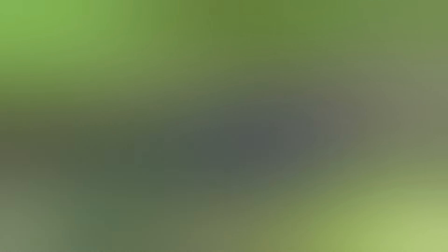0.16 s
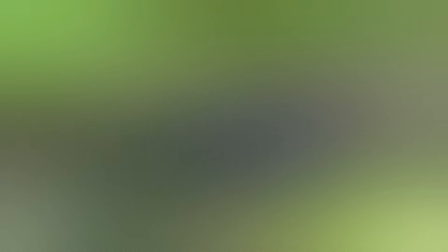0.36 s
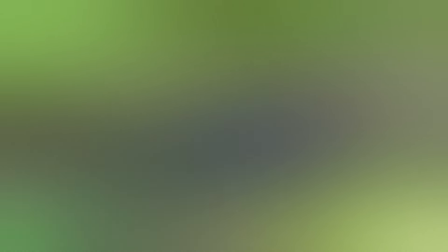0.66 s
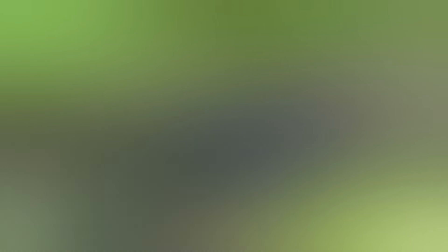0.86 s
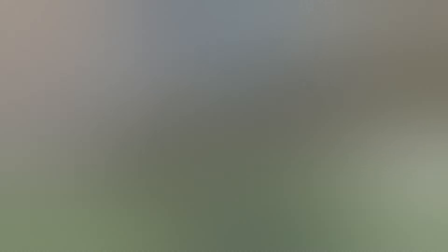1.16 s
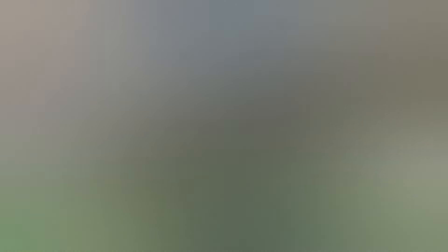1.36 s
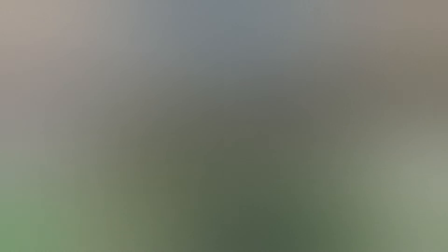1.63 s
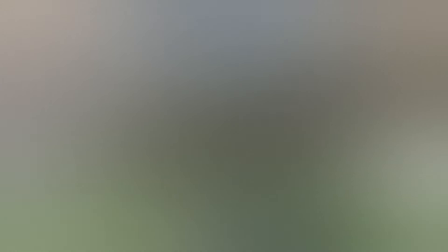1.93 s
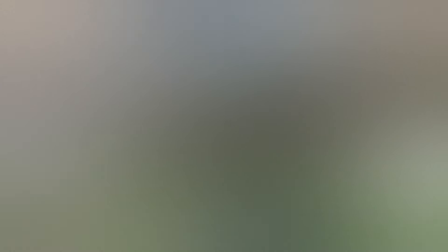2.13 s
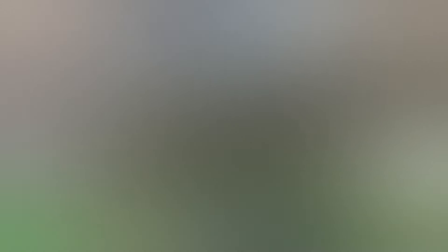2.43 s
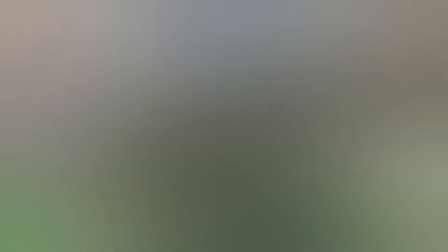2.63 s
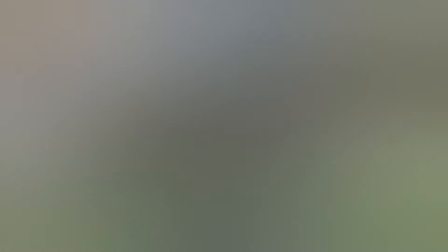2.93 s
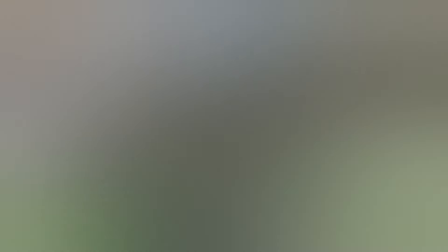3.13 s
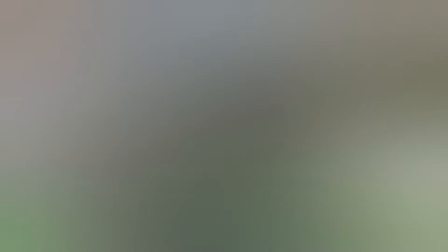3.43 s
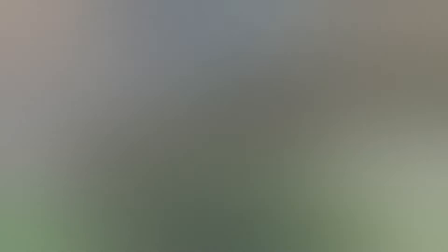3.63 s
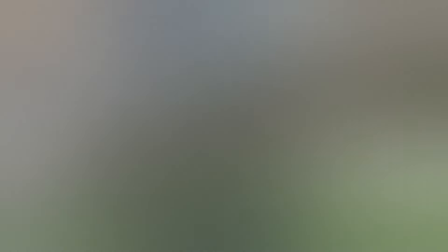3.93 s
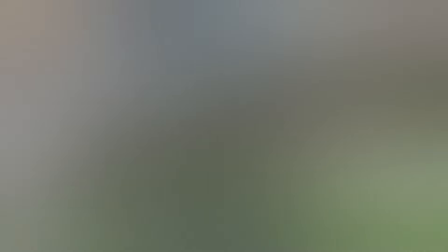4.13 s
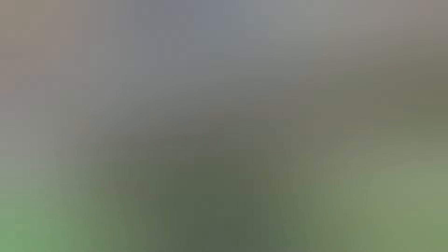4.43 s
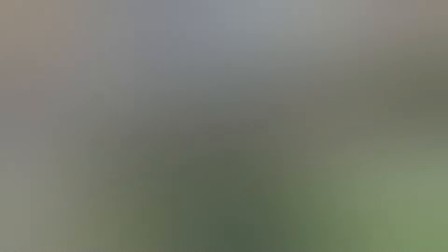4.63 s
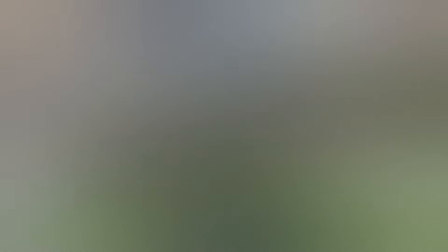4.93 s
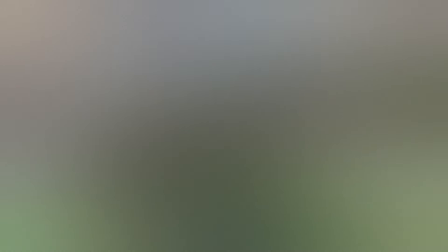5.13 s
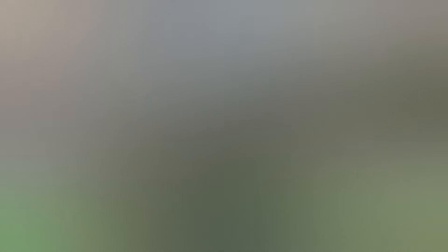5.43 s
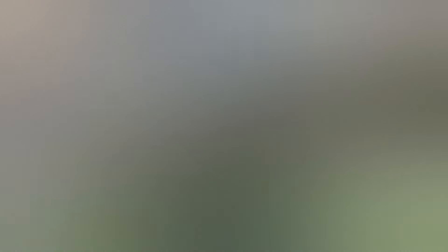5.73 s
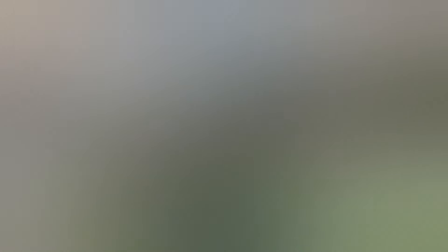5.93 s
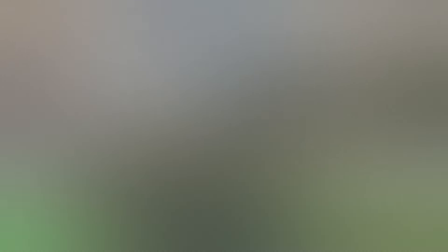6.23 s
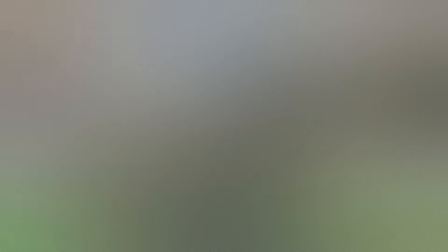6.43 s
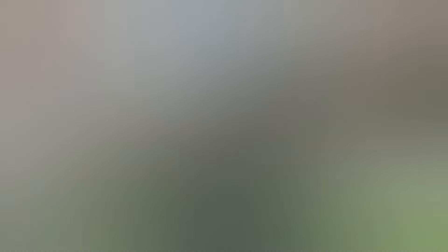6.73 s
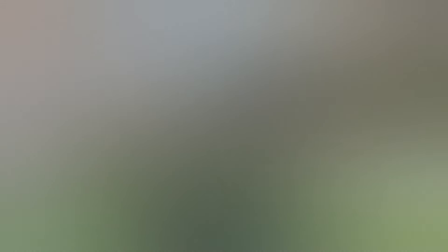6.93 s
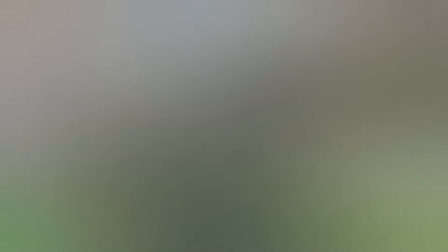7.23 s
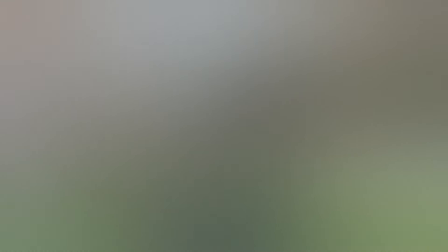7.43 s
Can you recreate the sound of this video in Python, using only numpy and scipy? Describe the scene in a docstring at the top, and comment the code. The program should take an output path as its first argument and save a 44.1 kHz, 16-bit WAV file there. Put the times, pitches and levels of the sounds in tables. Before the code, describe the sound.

Thin repeated birdsong and soft goose clucking fade out; a big hog-like animal grunts, whines, snuffles and puffs air very close.

```python
"""A large animal, close by, gives four deep rattling grunts: slack tissue flaps and puffs air into its throat.
Between them come thin whines, rushing gusts, snuffles and wet smacks: tones and noise shaped by the muzzle.
First, outdoors, a small bird repeats a thin chirping phrase of gliding sines, a farther one whistles down,
and a goose clucks in ringing pulses over a noise wash. That yard fades out before the animal's pen fades in."""
import sys
import numpy as np
from scipy import signal
from scipy.fft import rfft, irfft
from scipy.io import wavfile
from scipy.ndimage import uniform_filter1d

SR = 44100
rng = np.random.default_rng(int(sys.argv[2]) if len(sys.argv) > 2 else 0)


def file_out(sig):
    """Save sig as 16-bit WAV at sys.argv[1]."""
    # one column per channel
    cols = np.atleast_2d(sig).T
    # limit, then scale
    lim = np.clip(cols, -1, 1)
    pcm = np.round(lim * 32767).astype(np.int16)
    wavfile.write(sys.argv[1], SR, pcm)


N = 334278
T = np.arange(N) / SR  # s


def amp(db):
    """Decibels to linear gain."""
    return 10 ** (np.asarray(db) / 20)


def evened(x):
    """Scales to rms 1."""
    return x / np.sqrt(np.mean(x ** 2) + 1e-20)


def steadied(x, size=1700):
    """Levels the sound to about rms 1 throughout, keeping the detail within a cycle."""
    power = uniform_filter1d(uniform_filter1d(x ** 2, size), size // 2)
    return x / np.sqrt(abs(power) + 1e-14)


def curve(rows, t):
    """Each automation column of a table, read at the times t."""
    s, *columns = np.transpose(rows)
    return [np.interp(t, s, c) for c in columns]


def span(rows):
    """The sample times that a table covers."""
    return np.arange(rows[0][0], rows[-1][0], 1 / SR)


def add(mix, s, sound):
    """Drops a sound into the mix at time s, trimming what falls outside."""
    start = round(s * SR)
    sound = sound[max(-start, 0):]
    part = mix[max(start, 0):][:len(sound)]
    part += sound[:len(part)]


def band(x, lo_hz, hi_hz):
    """Band-pass without delay."""
    sos = signal.butter(4, [lo_hz, min(hi_hz, .49 * SR)], "band", fs=SR, output="sos")
    return signal.sosfiltfilt(sos, x)


def wobble(count, hz):
    """Smooth random modulation of rms 1, rolling off around hz."""
    rolloff = 1 + (np.fft.rfftfreq(count, 1 / SR) / hz) ** 4
    return evened(irfft(rfft(rng.standard_normal(count)) / rolloff, count))


def colour(x, points, peaks=(), size=8192):
    """Minimum-phase EQ: a smooth spectral shape with resonances that stand out of it."""
    hz, (f, db) = np.fft.rfftfreq(size, 1 / SR), np.transpose(points)
    gain = amp(np.interp(np.log(hz + 1), np.log(f + 1), np.maximum(db, -100)))
    for centre, width, height in peaks:
        gain = gain * (1 + amp(height) / (1 + (2 * (hz - centre) / width) ** 2))
    log_gain = np.log(np.r_[gain, gain[-2:0:-1]])
    taps = np.fft.ifft(np.exp(np.conj(signal.hilbert(log_gain)))).real[:size // 2]
    return signal.fftconvolve(x, taps)[:len(x)]


def resonate(x, hz, width):
    """One damped resonance, width in Hz."""
    return signal.lfilter(*signal.iirpeak(hz, hz / width, fs=SR), x)


def sweep(x, hz, width):
    """A resonance that glides along the curve hz: shift it to zero, smooth, shift back."""
    turn, r = np.exp(2j * np.pi * np.cumsum(hz) / SR), np.exp(-np.pi * width / SR)
    return 2 * (turn * signal.lfilter([1 - r], [1, -r], x / turn)).real


def envelope(t, attack_s, release_s, depth_db):
    """Attack, hold and release, in dB below the hold."""
    attack = np.maximum(1 - (t - t[0]) / attack_s, 0)
    release = np.maximum(1 - (t[-1] - t) / release_s, 0)
    return -depth_db * (attack + release)


def late_left(x, lag_s, edge_hz=5000):
    """Delays the left channel by a fraction of a millisecond, up to edge_hz: sound from the right."""
    hz = np.fft.rfftfreq(N, 1 / SR)
    turns = lag_s * hz / (1 + (hz / edge_hz) ** 6)
    return np.array([irfft(rfft(x[0]) * np.exp(-2j * np.pi * turns), N), x[1]])


# Spectral shapes of the outdoor wash in the yard and around the animal: f/Hz, relative level/dB
YARD_WASH = [(24, -59), (40, -20), (207, -8.5), (337, 0.5), (487, -0.5), (1180, -7.5), (1830, -14),
             (3550, -21.5), (4010, -9), (4650, -26.5), (9930, -37.5), (13000, -54), (14000, -65)]
PEN_WASH = [(15, -35), (25, -3), (224, -7), (293, -12), (488, -13.5), (709, -22), (1090, -24), (1630, -26),
            (1810, -29), (2560, -28), (3630, -39.5), (6900, -40.5), (15000, -52.5)]


def ambience(shape, db, swell_db):
    """Distant outdoor wash: coloured noise that swells at random."""
    return amp(db + swell_db * wobble(N, 8.4)) * evened(colour(rng.standard_normal(N), shape))


# Falling whistle of a farther bird: t/s, f/Hz, level/dB
FAR_WHISTLE = [(.97, 3600, -75), (1.035, 3310, -62), (1.055, 2790, -76), (1.09, 2910, -62),
               (1.11, 2840, -78)]


def far_bird():
    """One faint downward whistle, a sine gliding along the table."""
    t, mix = span(FAR_WHISTLE), np.zeros(N)
    hz, db = curve(FAR_WHISTLE, t)
    tone = np.sin(2 * np.pi * np.cumsum(hz) / SR)
    add(mix, t[0], amp(db) * tone * signal.windows.tukey(len(t), .2))
    return mix


# Clucks of the goose: t/s, level/dB before the goose trim, throat f/Hz
CLUCKS = [(0.07, -42.5, 816), (0.138, -38.5, 1320), (0.172, -44, 721), (1.253, -38.5, 1500),
          (1.263, -38, 610), (1.28, -38, 630), (1.297, -37.5, 737), (1.308, -36.5, 916), (1.332, -53, 577)]
# Resonances of its bill: f/Hz, width/Hz, level/dB
BILL = [(740, 470, -7), (1310, 340, -7), (1750, 350, -9)]


def goose(trim_db=-4):
    """Single dry pulses of the voice, noise bursts ringing in throat and bill."""
    mix, t = np.zeros(N), T[:SR // 25]
    for s, db, throat_hz in CLUCKS:
        pulse = rng.standard_normal(len(t)) * np.exp(-t / .003)
        resonances = BILL + [(throat_hz, 300, -3)]
        ring = sum(amp(height) * resonate(pulse, f, width) for f, width, height in resonances)
        ring = band(ring, 270, 1820)
        ring = ring / np.std(ring[:260])  # levelled on its opening
        add(mix, s, amp(db + trim_db) * ring * signal.windows.tukey(len(t), .04))
    return mix


# Notes of the bird's phrase: t/s after its start, length/s, first f/Hz, settled f/Hz, level/dB, buzz/rad
NOTES = [(0, 0.013, 3160, 3300, -45.5, 0), (0.02, .022, 3980, 4030, -38.5, 0),
         (0.037, 0.074, 4230, 3980, -33, .05), (0.07, 0.079, 4060, 3990, -46.5, 0.12),
         (0.18, 0.1, 4480, 4086, -38, 0.71)]
# Repeats of the phrase: t/s, level/dB added to its notes
PHRASES = [(-.221, -1), (0.221, -4), (0.665, -5.5), (1.106, -7)]


def bird(echo_db=-9, echo_t60=1.0, buzz_hz=235, fade_db=9):
    """Each note glides quickly to its pitch and fades; the last buzzes most. Trees scatter it back."""
    song = np.zeros(N)
    for start, phrase_db in PHRASES:
        for delay, length, first_hz, settled_hz, db, buzz in NOTES:
            t = np.arange(0, length, 1 / SR)
            depth = buzz * (1 - np.exp(-t / 0.011))  # the buzz sets in after the glide
            hz = settled_hz + (first_hz - settled_hz) * np.exp(-t / 0.0066)
            hz = hz + depth * 70 * wobble(len(t), 260)
            trill = np.sin(2 * np.pi * buzz_hz * t + 0.47 * wobble(len(t), 40))
            note = np.sin(2 * np.pi * np.cumsum(hz) / SR + depth * trill)
            note = note * signal.windows.tukey(len(t), .25)
            add(song, start + delay, amp(db + phrase_db - fade_db * t / length) * note)
    t = T[:SR // 2]
    tails = rng.standard_normal((2, len(t))) * amp(-60 * t / echo_t60)  # one per channel
    echo = signal.fftconvolve(song[None], tails / np.linalg.norm(tails[0]), axes=1)[:, :N]
    return song * amp([[.4], [-.4]]) + amp(echo_db) * echo


# Nostril squeak: t/s, length/s, f/Hz, level/dB
NOSE_WHISTLE = (2.772, .05, 1850, -62)


def nose_whistle(s, length, hz, db):
    """A brief thin squeak of a nostril: noise through one narrow resonance."""
    t = np.arange(0, length, 1 / SR)
    squeak = evened(resonate(rng.standard_normal(len(t)), hz, 25))
    return s, amp(db) * squeak * signal.windows.tukey(len(t), .4)


# Wet smacks of the mouth opening: t/s, tick level/dB, body level/dB
SMACKS = [(1.931, -62, -59), (4.181, -82, -29.5), (6.794, -37, -24)]


def smacks():
    """The mouth opens with a tiny noise click and a band-passed body."""
    mix, t = np.zeros(N), T[:SR // 100]
    for s, tick_db, body_db in SMACKS:
        click = rng.standard_normal(len(t)) * np.exp(-t / 0.0012)
        add(mix, s, amp(tick_db) * click + amp(body_db) * band(click, 230, 2600))
    return mix


# Short snuffles: t/s, level/dB before make-up gain and envelope, resonance f/Hz, decay/s
SNUFFLES = [(2.824, -41.5, 425, 0.0092), (4.18, -40, 370, 0.0051), (4.324, -39, 406, 0.0057),
            (5.56, -38, 326, 0.017)]
# Spectral shape of a snuffle: f/Hz, level/dB
SNUFFLE_COLOUR = [(47, -23), (80, -8), (360, -6.5), (638, -14.5), (1190, -19), (1650, -32), (2870, -33.5),
                  (4280, -57), (5000, -46), (6500, -80), (11000, -120)]


def snuffle(s, db, hz, decay):
    """A short puff that rings the nose."""
    t = np.arange(SR // 8) / SR
    puff = colour(rng.standard_normal(len(t)), SNUFFLE_COLOUR, [(hz, 70, 5)])
    shape = (1 - np.exp(-t / 0.0049)) * np.exp(-t / decay)
    return s, amp(db + 12.5) * steadied(puff) * shape


# Spectral shape of air in the muzzle: f/Hz, level/dB
MUZZLE = [(40, -35.5), (130, 1.5), (220, -5.5), (340, 3), (450, 3), (540, 5), (640, -4), (980, -3),
          (1200, -10), (1330, -14), (1500, -11), (2030, -26.5), (3010, -21), (4240, -44.5), (7000, -40.5)]
# Muzzle resonances with the lips "shut" and "parted": f/Hz, width/Hz, level/dB
MUZZLE_PEAKS = {"shut": [(378, 44, 0), (536, 18, 1), (753, 50, 5.5), (980, 120, -2), (1160, 66, 5.5),
                (1493, 39, -7), (2640, 37, -11)], "parted": [(579, 49, 2.5), (878, 78, 7), (1240, 78, -6.5),
                (1940, 150, 8), (2240, 53, 9), (2500, 100, 5.5)]}


def airflow(db, lips, flutter_db=1.2):
    """Uneven turbulence in the resonances of the muzzle, following the level db."""
    uneven = rng.standard_normal(len(db)) * amp(flutter_db * wobble(len(db), 65))
    air = colour(uneven, MUZZLE, MUZZLE_PEAKS[lips])
    air = air + 0.16 * np.roll(air, round(0.00315 * SR))  # the ground reflection ripples its spectrum
    air /= np.std(band(air, 317, 3500))
    return amp(db) * air * signal.windows.tukey(len(db), .03)


# Tuneless gusts through the muzzle, and at 2.592 s and 7.44 s a faint tail of air just after a grunt ends: t/s,
# length/s, level/dB before envelope and fade, lips
GUSTS = [(1.848, 0.091, -49.5, "shut"), (2.592, 0.091, -61, "shut"), (2.77, .08, -55.5, "shut"),
         (2.863, 0.27, -47.5, "shut"), (4.411, 0.31, -45.5, "parted"), (5.589, 0.16, -50.5, "shut"),
         (6.705, 0.049, -42.5, "shut"), (7.44, 0.12, -60, "shut")]
GUST_ATTACK_S, GUST_RELEASE_S, GUST_DEPTH_DB, GUST_FADE_DB_PER_S = 0.034, 0.053, 9, 25


def gust(length, db, lips):
    """Air alone, starting quickly and ebbing."""
    t = np.arange(0, length, 1 / SR)
    shape_db = envelope(t, GUST_ATTACK_S, GUST_RELEASE_S, GUST_DEPTH_DB)
    return airflow(db + shape_db - GUST_FADE_DB_PER_S * t, lips)


# Whines: t/s, length/s, tone level/dB and overtone level/dB and air level/dB before movement, lips
WHINES = [(1.604, .26, -26.5, -9.5, -37.5, "shut"), (3.139, 0.393, -40.5, -8, -48, "parted"),
          (4.545, 0.355, -36, -8.5, -38.5, "parted"), (5.68, 1.03, -28, -14, -40.5, "shut")]
# Pitch glides, a list for each of the three short whines and one for the long: t/s, f/Hz
SHORT_WHINE_PITCH = [
    [(1.62, 280.2), (1.774, 269.1), (1.812, 296.6), (1.83, 355), (1.85, 350)],
    [(3.165, 369), (3.241, 326.8), (3.317, 332), (3.345, 313), (3.52, 313)],
    [(4.598, 329.7), (4.672, 294), (4.726, 283.8), (4.84, 291.8), (4.89, 352)],
]
LONG_WHINE_PITCH = [(5.7, 364.3), (5.784, 316), (5.898, 283.6), (6.02, 278.6), (6.11, 299.6), (6.292, 301),
                    (6.38, 283.1), (6.634, 266), (6.67, 284.2), (6.69, 344), (6.71, 354)]
# Moments when the whine breaks up: t/s, length/s, added roughness (0-1)
BREAKS = [(1.7, 0.054, 0.38), (1.758, 0.087, 0.25), (3.318, 0.065, 0.7), (5.875, 0.236, 0.76),
          (6.55, 0.15, 0.34)]
WHINE_ROUGH, BREAK_EDGE_S = 0.17, 0.0083
BREAK_AIR_DB = 9.5  # at full break; a broken tone lets more air through
WHINE_ATTACK_S, WHINE_RELEASE_S, WHINE_DEPTH_DB = 0.053, 0.03, 18.5
TONE_SWELL_DB_PER_S, AIR_SWELL_DB_PER_S = 5.5, 8  # the push grows through each whine
WHINE_WAVER_DB, OVERTONE_FLICKER_DB = 0.6, 3


def whine(pitch, start, length, tone_db, overtone_db, air_db, lips, count=6):
    """A nearly pure tone and rushing air from the narrowed airway; it flutters when it breaks up."""
    t = start + np.arange(0, length, 1 / SR)
    hz, = curve(pitch, t)
    push_db = envelope(t, WHINE_ATTACK_S, WHINE_RELEASE_S, WHINE_DEPTH_DB)
    from_middle = t - t.mean()
    broken = sum(depth * np.clip(np.minimum(t - s, s + lasts - t) / BREAK_EDGE_S, 0, 1)
                 for s, lasts, depth in BREAKS)
    rough = np.clip(WHINE_ROUGH + broken, 0, 1)
    phase = 2 * np.pi * np.cumsum(hz * (1 + 0.0039 * wobble(len(t), 46))) / SR
    phase = phase + 0.51 * rough * wobble(len(t), 70)
    tone = np.sin(phase)
    for k in range(2, count):  # overtones light up as they cross the muzzle's resonances
        gain = sum(amp(height) / (1 + (2 * (k * hz - centre) / width) ** 2)
                   for centre, width, height in MUZZLE_PEAKS[lips])
        flicker = amp(overtone_db + OVERTONE_FLICKER_DB * wobble(len(t), 4.2))
        tone = tone + gain / (k - 1) * flicker * np.sin(k * phase)
    flutter_db = 5.0 * rough * wobble(len(t), 66) - 2.1 * rough
    flutter = amp(flutter_db + WHINE_WAVER_DB * wobble(len(t), 7.2))
    tone = np.sqrt(2) * amp(tone_db + push_db + TONE_SWELL_DB_PER_S * from_middle) * tone * flutter
    air = airflow(air_db + push_db + AIR_SWELL_DB_PER_S * from_middle + BREAK_AIR_DB * broken, lips)
    return start, tone * signal.windows.tukey(len(t), .03) + air


# Effort climbs from far below, arches, and lets go
GRUNT_ATTACK_S, GRUNT_DEPTH_DB, GRUNT_ARCH_DB = .11, 22, 11
# Level change per unit of mouth opening: an open mouth drains the chest tone
CHEST_PER_OPENING_DB, MOUTH_PER_OPENING_DB, RASP_PER_OPENING_DB = -1.5, 6.5, 2
# A rough throat squeals, lower as the mouth opens
SQUEAL_HZ, SQUEAL_FALL_HZ, SQUEAL_WANDER_HZ, SQUEAL_WIDTH_HZ = 715, 99, 45, 30


def grunt(length, release_s, levels_db, moves, throat, peaks, puff_s, leak, rasp_share, spit_db, rebound_db,
          lag_hz, squeal_db, jitter=.08, shimmer_db=3):
    """Slack tissue flaps shut, rings the throat, and lets through a puff of air on every cycle."""
    t = np.arange(0, length, 1 / SR)
    rate, rough, opening = curve(moves, t)
    rough = np.clip(rough, 0, 1)
    effort_db = envelope(t, GRUNT_ATTACK_S, release_s, GRUNT_DEPTH_DB)
    effort_db = effort_db - GRUNT_ARCH_DB * (2 * t / length - 1) ** 2
    slopes = CHEST_PER_OPENING_DB, MOUTH_PER_OPENING_DB, RASP_PER_OPENING_DB
    chest_db, mouth_db, rasp_db = (db + effort_db + slope * opening for db, slope in zip(levels_db, slopes))
    turns = np.cumsum(rate) / SR + jitter * rough * wobble(len(t), 43.2)
    age = (turns % 1) / rate  # seconds since the last flap
    ticks = np.diff(np.floor(turns), prepend=-1)
    flaps = evened(ticks * amp(shimmer_db * rough * wobble(len(t), 52)))
    # air and wet crackle burst out with each flap, and leak all through the cycle when it is rough
    gap = leak * rough + np.exp(-age / puff_s)
    puffs = evened(gap * rng.standard_normal(len(t)))
    spit = evened(gap * rng.standard_normal(len(t)) * (rng.random(len(t)) < 700 / SR))
    voice = colour(flaps + rough * puffs, throat, peaks)
    voice = voice - 2 * resonate(voice, lag_hz, 125)  # the deep cavity answers late: each beat falls in pitch
    # the tissue slaps back after each flap
    rebound = np.roll(flaps, round(.0068 * SR)) * amp(rebound_db + 3.0 * wobble(len(t), 60))
    slaps = colour(flaps + rebound, [(1200, 0.0), (3500, -18.5)])
    share = np.clip(rasp_share, 0, .75)
    rasp = colour((1 - share) * slaps + share * puffs + amp(spit_db) * rough * spit, throat, peaks)
    squeal_hz = SQUEAL_HZ - SQUEAL_FALL_HZ * opening + SQUEAL_WANDER_HZ * wobble(len(t), 12)
    rasp = rasp + amp(squeal_db) * rough * sweep(rasp, squeal_hz, SQUEAL_WIDTH_HZ)
    sound = amp(chest_db) * steadied(band(voice, 25, 279))
    sound += amp(mouth_db) * steadied(band(voice, 289, 599))
    sound += amp(rasp_db) * steadied(band(rasp, 568, 5500))
    return sound * signal.windows.tukey(len(t), .04)


# Grunts: t/s, length/s, release/s, then chest, mouth and rasp level/dB before effort and opening, voice
GRUNTS = [(1.92, 0.7, 0.069, -13.5, -18, -25, "bellow"), (3.596, 0.62, 0.13, -27.5, -29, -34.5, "low"),
          (4.953, .49, 0.05, -21, -18.5, -26.5, "open"), (6.763, 0.7, 0.069, -13, -18, -25, "bellow")]
# Throat shapes of the three voices: f/Hz, level/dB
BELLOW_THROAT = [(26, -38), (45, -29), (76, -17), (107, -8), (177, -16.5), (227, 0.5), (286, -12.5),
                 (340, -11), (429, -28), (721, -16), (892, -24), (1100, -21.5), (1190, -26.5), (2670, -37),
                 (4500, -57), (5850, -78), (9900, -120)]
LOW_THROAT = [(26, -69), (45, -11), (80, -2), (101, 3.5), (135, 1), (167, 2.5), (303, 0.5), (382, 11.5),
              (421, 0), (607, 6.5), (668, -14), (963, -7.5), (1100, -20), (1970, -21.5), (4500, -48.5),
              (5850, -95), (9900, -120)]
OPEN_THROAT = [(26, -67), (45, -28), (101, -14), (180, -15), (250, -2), (292, -13), (368, 2.5), (446, -13),
               (530, -10), (643, -21), (736, -12.5), (963, -26), (1930, -29), (2160, -32), (4500, -57.5),
               (5850, -68), (9900, -120)]
# Sharp resonances on top of each shape: f/Hz, width/Hz, level/dB
BELLOW_PEAKS = [(237, 43, 1.5), (360, 57, 1), (734, 23, -5), (1108, 29, -1.5), (1420, 86, -3),
                (3080, 570, -8)]
LOW_PEAKS = [(170, 15, -3.5), (386, 12, 3), (616, 48, -23), (764, 46, 1), (980, 83, -16), (1646, 69, 3),
             (1980, 86, 2), (2790, 180, 10)]
OPEN_PEAKS = [(270, 19, -1), (368, 44, 0.5), (556, 62, -1.5), (740, 110, -10.5), (1124, 70, 3)]
# How each voice moves: t/s into the grunt, flap f/Hz, roughness (0-1), mouth opening (about -1 to 1)
BELLOW_MOVES = [(0, 56, 0.77, 1), (.12, 45.5, .18, 0.63), (.225, 44.4, 0.11, -0.37), (.26, 58, 0.71, -1.34),
                (.32, 56.3, 0.43, 0.54), (.39, 56.5, .58, -0.83), (.5, 53.5, .85, 1),
                (.6, 55.3, 0.77, 0.69), (.67, 48.5, 0.4, 0.18)]
LOW_MOVES = [(.06, 47.45, 0.65, -0.2), (.12, 54.6, 0.55, -.5), (.16, 54.52, 0.27, -.5),
             (.195, 63.57, 0.28, -1.4), (.29, 56.4, 0.07, 0.28), (.37, 56.5, .08, -.4),
             (.45, 55.15, 0.076, 1), (.52, 53.5, 0.43, -1.4)]
OPEN_MOVES = [(.06, 60.25, 0.41, -0.64), (.125, 59.63, 0.15, -0.58), (.185, 53.3, 0.17, -0.13),
              (.3, 52.27, 0.19, 0.1), (.365, 48.2, .11, -.2), (.435, 43.5, 0.15, -0.088)]


def grunts():
    """Four grunts in three voices, each with its own throat, movement and wetness."""
    mix = np.zeros(N)
    voices = {
        "bellow": dict(moves=BELLOW_MOVES, throat=BELLOW_THROAT, peaks=BELLOW_PEAKS, puff_s=0.0085, leak=1.0,
                       rasp_share=0.68, spit_db=-1.0, rebound_db=0, lag_hz=253, squeal_db=-1),
        "low": dict(moves=LOW_MOVES, throat=LOW_THROAT, peaks=LOW_PEAKS, puff_s=0.0097, leak=.6,
                    rasp_share=0.59, spit_db=3, rebound_db=-16, lag_hz=146, squeal_db=-1),
        "open": dict(moves=OPEN_MOVES, throat=OPEN_THROAT, peaks=OPEN_PEAKS, puff_s=0.0078, leak=0.86,
                     rasp_share=0.68, spit_db=-11, rebound_db=-9, lag_hz=243, squeal_db=-3)}
    for s, length, release_s, *levels_db, voice in GRUNTS:
        add(mix, s, grunt(length, release_s, levels_db, **voices[voice]))
    return mix


# Spectral shape of the fine hiss: f/Hz, level/dB
HISS = [(2500, -36), (3800, 1), (6000, 2), (10000, -11.5), (15000, -23)]


def animal(hiss_db=-42):
    """Grunts, whines, gusts, snuffles and smacks, with a fine hiss that follows their strength."""
    mix = grunts() + smacks()
    for pitch, row in zip([*SHORT_WHINE_PITCH, LONG_WHINE_PITCH], WHINES):
        add(mix, *whine(pitch, *row))
    for s, *row in GUSTS:
        add(mix, s, gust(*row))
    for row in SNUFFLES:
        add(mix, *snuffle(*row))
    add(mix, *nose_whistle(*NOSE_WHISTLE))
    hiss = evened(colour(rng.standard_normal(N), HISS))
    return mix + amp(hiss_db) * mix * hiss


# Two mirror frequencies of the sheen: f/Hz, and in the same order level/dB
MIRROR_HZ = (12100, 7830)
MIRROR_DB = (-15.5, -24.5)


def sheen(x):
    """A faint glassy sheen: the sound's slope is mirrored about two high frequencies."""
    carriers = sum(2 * amp(db) * np.cos(2 * np.pi * hz * T) for hz, db in zip(MIRROR_HZ, MIRROR_DB))
    return x + np.gradient(x) * carriers


# Faders of the yard and of the pen: t/s, gain (linear)
YARD_FADER = [(0, 1), (1.37, 1), (1.41, 0)]
PEN_FADER = [(1.59, 0), (1.72, 1), (7.58, 1)]


def scene():
    """The yard with the birds fades out before the animal's pen comes in."""
    breeze = np.array([ambience(YARD_WASH, -67, 0.58) for _ in range(2)])  # independent left and right
    ground = goose() + ambience(YARD_WASH, -52.8, 1.0) + breeze
    ground = ground * amp([[-.8], [.8]])  # leans right
    yard = late_left(bird() + far_bird(), 1.5e-5) + late_left(ground, 7e-5)  # lags in s
    pen = sheen(animal()) + ambience(PEN_WASH, -51, 2.9)
    return yard * curve(YARD_FADER, T)[0] + pen * curve(PEN_FADER, T)[0]


def record(dry, ceiling=0.44):
    """Rounds peaks off below the ceiling, then low-passes at 15600 Hz."""
    soft = dry / (1 + (dry / ceiling) ** 4) ** (1 / 4)
    low_pass = signal.firwin(511, 15600, window=("kaiser", 9), fs=SR)
    return signal.oaconvolve(soft, low_pass[None], "same")


dry = scene()
out = record(dry)
file_out(out)
```